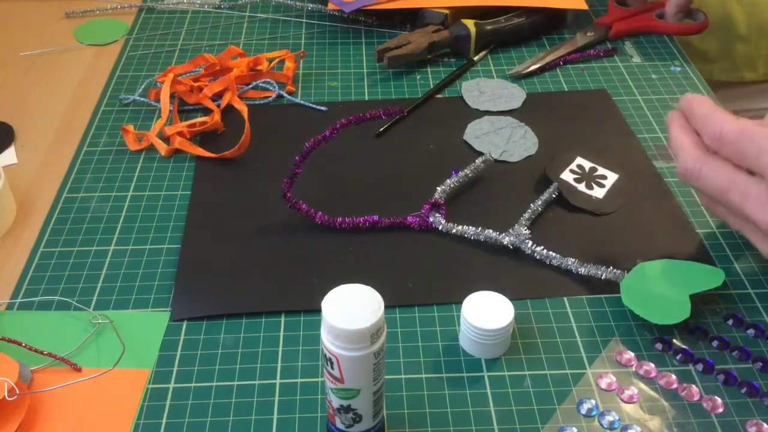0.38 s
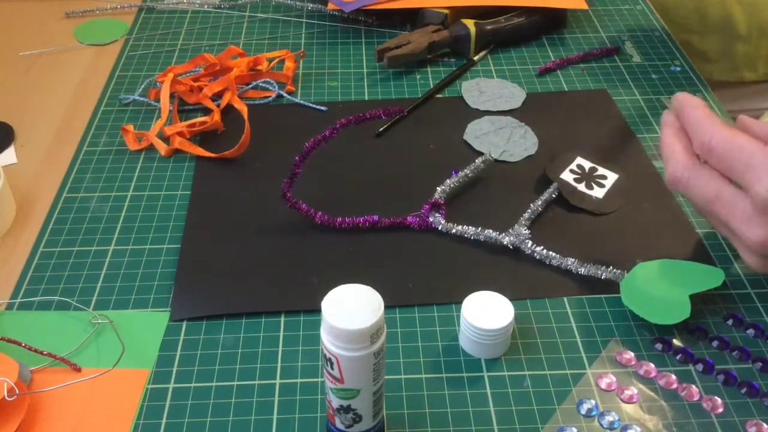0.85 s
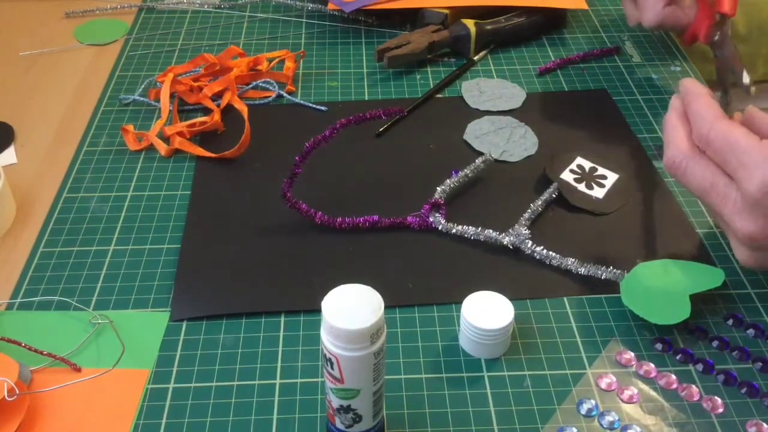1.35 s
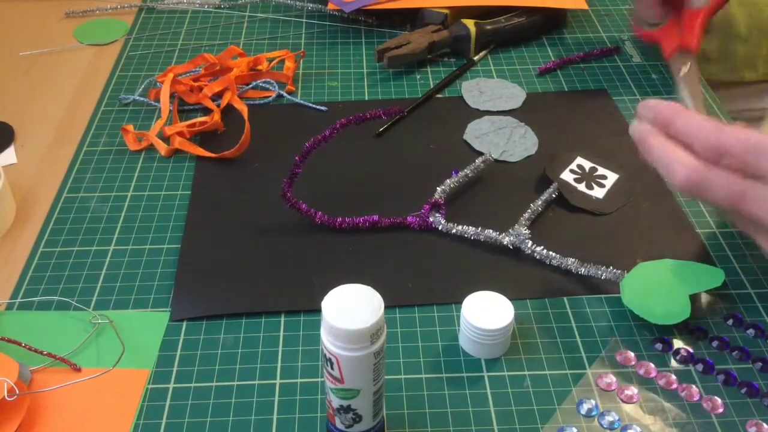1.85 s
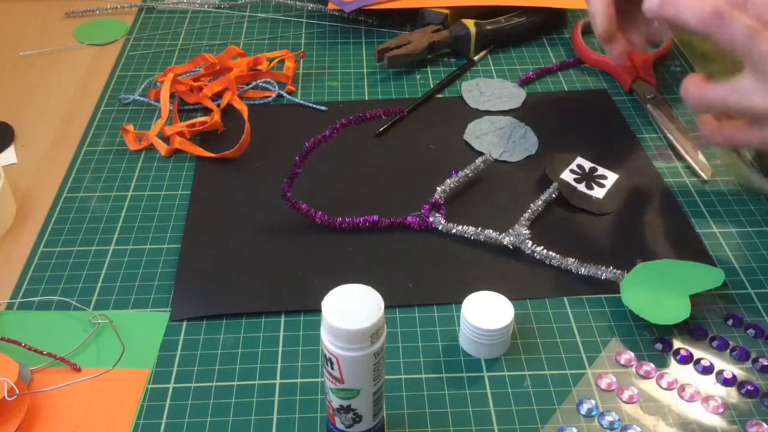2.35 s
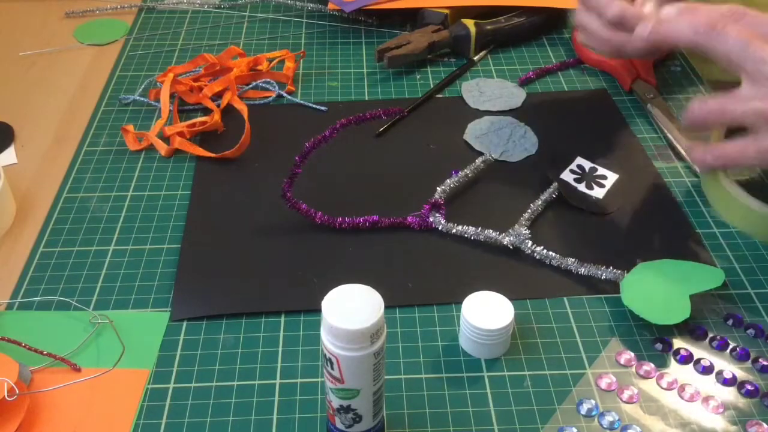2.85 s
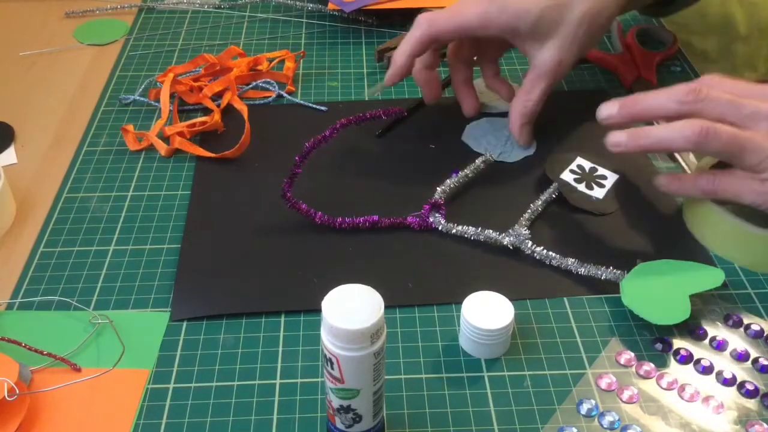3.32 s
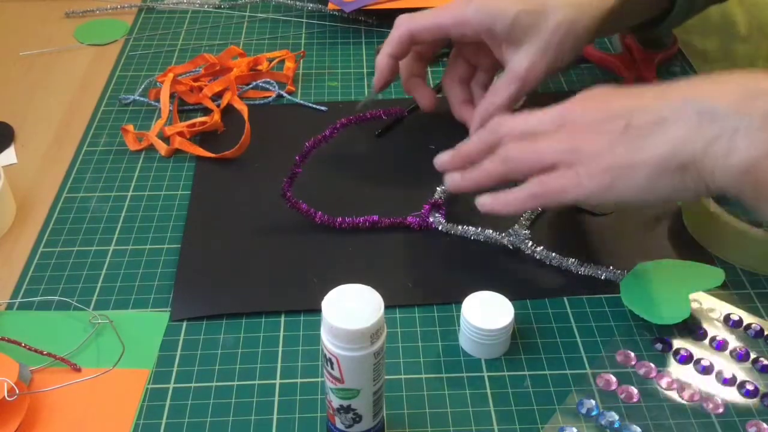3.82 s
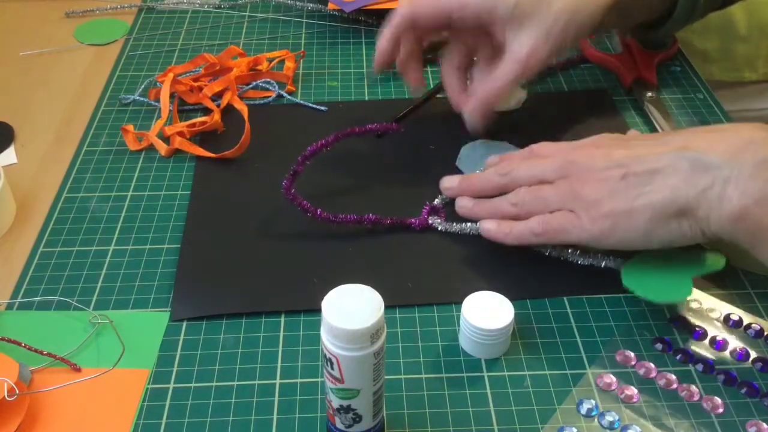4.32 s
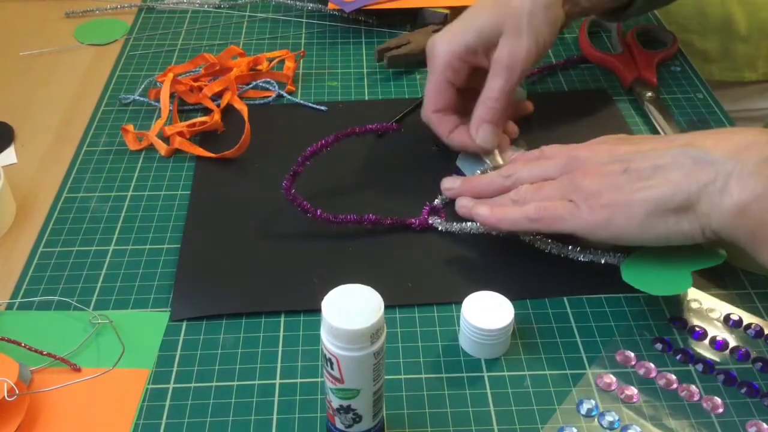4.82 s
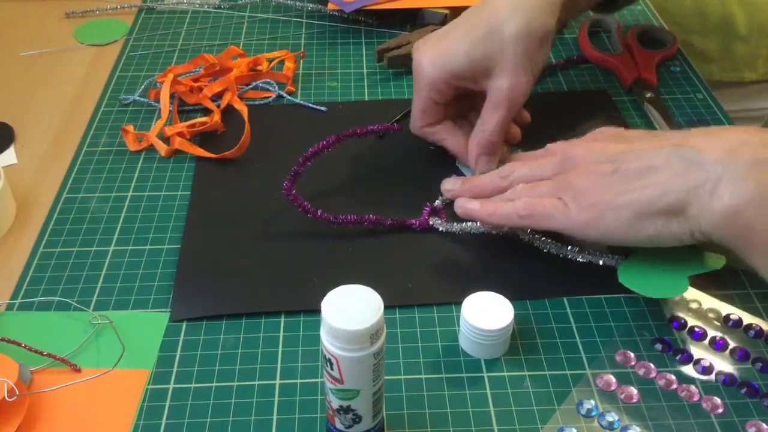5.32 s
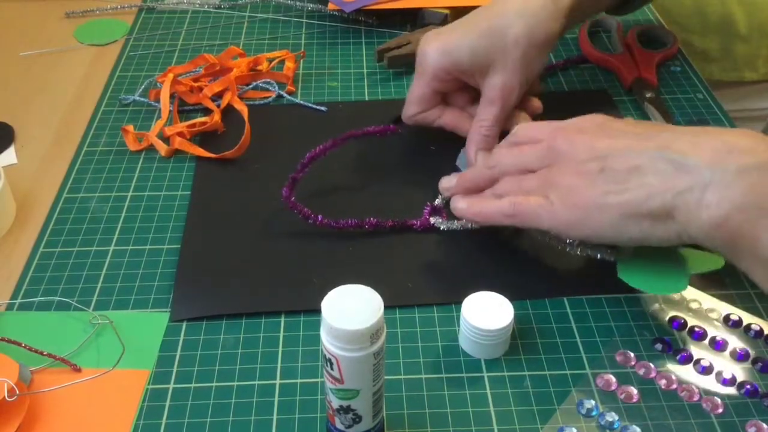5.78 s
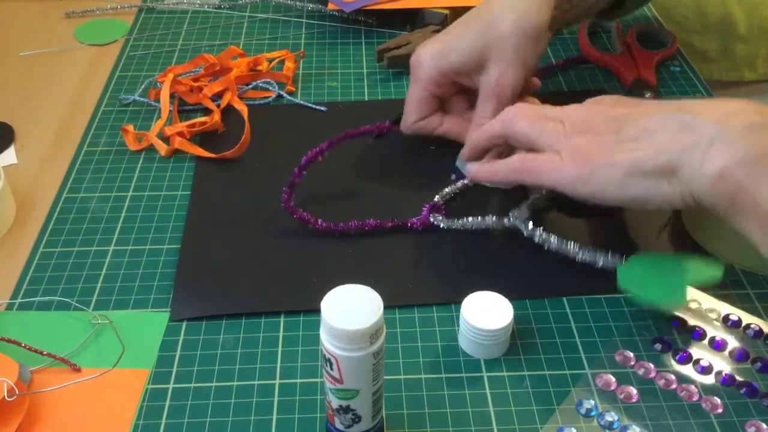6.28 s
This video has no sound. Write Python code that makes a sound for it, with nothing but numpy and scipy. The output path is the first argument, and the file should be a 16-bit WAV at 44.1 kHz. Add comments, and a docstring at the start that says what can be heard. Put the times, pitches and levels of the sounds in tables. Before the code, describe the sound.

Close, dry sounds of hands at a craft table in a small quiet room. Sparse bright ticks of tape build into a tight cluster of snaps and a firm knock as something is put down around two seconds. More crackles and brushing follow near three, then faint finger rustle, and a last sharp pair of clicks past five seconds with soft table bumps.

```python
"""Tape, scissors and card snap in short bright clicks over a craft table in a small quiet room:
noise bursts ring a body, a crack and a tick, and echo from nearby surfaces, strongest after 6.7 ms.
Fingers rustle over card and tinsel: clumped random slips, shaped by strokes and slides.
Things knock on the table top, ringing its damped modes; rumble and room air are filtered noise."""
import sys
import numpy as np
from scipy import signal
from scipy.fft import rfft, irfft, next_fast_len
from scipy.io import wavfile
from scipy.ndimage import uniform_filter1d

SR = 44100
rng = np.random.default_rng(int(sys.argv[2]) if len(sys.argv) > 2 else 0)


def materialize(psi):
    """Save the field psi as 16-bit PCM at rate SR to the path in sys.argv[1].

    A 1-D psi becomes a single channel; in a 2-D psi each row is a channel.
    """
    bounded = np.clip(np.atleast_2d(psi).T, -1, 1)
    quanta = np.round(bounded * 32767).astype(np.int16)
    wavfile.write(sys.argv[1], SR, quanta)


def undo_db(level):
    """Turn decibels back into plain size, where 20 dB means ten times bigger."""
    steps = np.asarray(level, float) / 20
    return 10 ** steps


N = 282681


def rms_one(x):
    """Scale to rms 1."""
    return x / np.sqrt(np.mean(x ** 2) + 1e-20)


def in_time(rows):
    """Interpolate each column of a time table at every sample."""
    s, *columns = np.transpose(rows)
    return [np.interp(np.arange(N) / SR, s, column) for column in columns]


def band(x, low_hz, high_hz):
    """Second-order Butterworth band-pass."""
    sos = signal.butter(2, [low_hz, min(high_hz, 0.45 * SR)], "band", fs=SR, output="sos")
    return signal.sosfilt(sos, x)


def colour(x, points):
    """Shape by a spectrum, straight dB lines on log frequency; rms 1."""
    hz, level_db = np.transpose(points)
    size = next_fast_len(N)
    log_hz = np.log(np.arange(1, size // 2 + 2) * SR / size)
    gain_db = np.interp(log_hz, np.log(hz), level_db, left=-60, right=-60)
    return rms_one(irfft(rfft(x, size) * undo_db(gain_db), size)[:N])


def drift(rate_hz):
    """Slow random wander of rms 1: noise through two equal one-pole low-passes."""
    step = 40  # samples per slow value
    r = np.exp(-2 * np.pi * rate_hz * step / SR)
    noise = rng.standard_normal(N // step + 2002)
    slow = signal.lfilter([1], [1, -2 * r, r * r], noise)[2000:]  # settled part
    return np.interp(np.arange(N) / step, np.arange(len(slow)), rms_one(slow))


def grains(per_s, spread_db):
    """Random tiny slips of uneven size."""
    sizes = undo_db(spread_db * np.minimum(rng.exponential(1, N), 4)) * rng.standard_normal(N)
    return sizes * (rng.random(N) < per_s / SR)


def dying(s, level_db, t60_s):
    """Envelope that jumps up at each moment and dies away exponentially."""
    kicks = np.full(N, 1e-18)
    np.add.at(kicks, np.round(s * SR).astype(int), undo_db(level_db))
    return signal.lfilter([1], [1, -undo_db(-60 / (t60_s * SR))], kicks)


# room air spectrum: (frequency [Hz], relative density [dB per Hz])
AIR_SPECTRUM = [(180, -23), (300, -17), (502, -5.5), (885, -8), (1080, -2.5), (1560, -11), (2880, -18.5),
                (6620, -20.5), (7690, -22.5), (9550, -13), (10700, -17.5), (12500, -20), (16000, -51.5)]
AIR_RMS_DB = -79.5


def room_air():
    """Steady noise with the spectrum of the room air."""
    return undo_db(AIR_RMS_DB) * colour(rng.standard_normal(N), AIR_SPECTRUM)


# arms and table shifting: (time [s], below 90 Hz [dB], 90-220 Hz [dB], 220-450 Hz [dB])
RUMBLE_LEVELS = [(0.0, -72, -63, -69.5), (0.39, -83, -67, -68.5), (0.73, -67.5, -62.5, -75.5),
                 (1.11, -74, -62, -75.5), (1.62, -71.5, -72, -79.5), (1.82, -84, -64, -80),
                 (1.96, -60, -64.5, -71), (2.16, -77.5, -74, -78), (2.86, -76.5, -68, -71),
                 (3.78, -80.5, -74, -82.5), (4.36, -77, -73.5, -78.5), (4.86, -83.5, -67, -79),
                 (5.05, -79.5, -64.5, -75.5), (5.25, -74, -63, -73), (5.39, -73, -78, -65),
                 (5.55, -66.5, -67, -75), (6.02, -76.5, -72, -77), (6.41, -75.5, -70.5, -73.5)]
# soft thuds of an arm or wrist on the table: (centre [s], level [dB], width [s])
ARM_THUDS = [(.075, -61, 0.017), (.55, -53.5, 0.045), (.953, -68, 0.07), (1.3, -77, 0.047),
             (1.859, -59, 0.029), (3.21, -66.5, .05), (4.729, -70, 0.065), (5.35, -64, 0.03),
             (5.618, -50, .045), (2.06, -63, 0.035), (2.93, -63, 0.043)]
# shaking after a knock, one entry per rumble band: (level against the knock [dB])
SHAKE_LEVELS_DB = [-20.5, -22.5, -8.5]
SHAKE_T60_S, SHAKE_SWELL_S = 0.1, 0.008


def rumble():
    """Lumpy low noise carried through the table; thuds stir the lowest band, knocks stir all three."""
    out, t = np.zeros(N), np.arange(N) / SR
    knock_s, knock_db, *_ = np.transpose(TABLE_STRIKES)
    thuds = sum(undo_db(level_db) * np.exp(-((t - centre) / width) ** 2)
                for centre, level_db, width in ARM_THUDS)
    bands_hz = [(42, 79.7), (95, 192.4), (215, 349)]
    rows = zip(in_time(RUMBLE_LEVELS), SHAKE_LEVELS_DB, [thuds, 0, 0], bands_hz)
    for level_db, shake_db, extra, (low_hz, high_hz) in rows:
        noise = band(rng.standard_normal(N), low_hz, high_hz)
        noise = band(noise, 0.86 * low_hz, 1.25 * high_hz)
        shake = dying(knock_s + SHAKE_SWELL_S / 2, knock_db + shake_db, SHAKE_T60_S)
        shake = uniform_filter1d(shake, round(SHAKE_SWELL_S * SR))
        out += rms_one(noise) * (undo_db(level_db) + extra + shake) * undo_db(1.5 * drift(21))
    return out


# blows that ring the table top: knocks, plus rows with the spot at 1304 Hz that ring along with a snap at the
# same moment: (time [s], strength [dB], hardness [0-1], modes favoured by the spot [Hz])
TABLE_STRIKES = [(0.072, -73, 1, 250), (.240, -53, 0.45, 630), (0.336, -54.5, 0, 294),
                 (0.366, -57.5, 0.1, 357), (0.409, -55, .1, 177), (0.433, -45.5, 0.83, 630),
                 (1.4396, -67.5, 1, 1304), (1.501, -62.5, 1, 1304), (1.820, -38, 0.71, 255),
                 (1.832, -37, 0.5, 111), (1.853, -45.5, 0, 180), (2.019, -46, 0.66, 270),
                 (2.024, -34.5, 0.82, 377), (2.04, -40.5, 0.7, 109), (2.32, -71, 1, 1304),
                 (2.356, -61.5, 0, 252), (2.411, -57.5, 0.2, 260), (2.889, -46.5, 0.5, 253),
                 (2.904, -38.5, 0.34, 379), (2.914, -53.5, 0.7, 179), (3.1034, -56, 1, 1304),
                 (3.123, -64, 0.1, 340), (3.192, -45, 0.5, 222), (3.248, -63, 0.44, 245),
                 (4.721, -63, 1, 575), (5.179, -63, 0.43, 630), (5.29, -60.5, 0.65, 770),
                 (5.342, -49, 0.8, 238), (5.397, -43, 0.36, 237), (5.429, -48, 0.2, 584),
                 (5.729, -64, 0.7, 1004), (5.979, -62.5, 0.76, 243), (6.32, -66, 1, 267)]
# table top modes: (frequency [Hz], relative level [dB], t60 [s])
TABLE_MODES = [(110, -9.5, 0.22), (178.2, -7.5, 0.13), (260, -5, 0.22), (380, -5.5, 0.091),
               (630, -3.5, 0.055), (770, -3, 0.048), (1014, -3.5, .09), (1304, -1.5, 0.037),
               (1840, -3.5, 0.034), (2240, -7.5, 0.033), (2224, -8, 0.036), (2420, -19.5, 0.051)]


def knocks():
    """A blow rings each damped mode; soft blows miss the high modes, the spot struck favours some. Rows with
    the spot at 1304 Hz give the low body ringing of a snap at the same moment."""
    rows, out = np.array(TABLE_STRIKES), np.zeros(N)
    s, strength_db, hardness, spot_hz = rows.T
    at = np.round(s * SR).astype(int)
    chance_db = 2.5 * rng.standard_normal((len(rows), len(TABLE_MODES)))
    for k, (hz, level_db, t60_s) in enumerate(TABLE_MODES):
        clicks = np.full(N, 1e-18)
        dulling_db = -8.0 * (1 - np.clip(hardness, 0, 1)) * np.log2(hz / 250)
        spot_db = 8.06 * np.exp(-(np.log2(hz / spot_hz) / 0.1) ** 2)
        blow_db = strength_db + level_db + dulling_db + spot_db + chance_db[:, k]
        clicks[at] = undo_db(blow_db) * (-1) ** k
        r, w = undo_db(-60 / (t60_s * SR)), 2 * np.pi * hz / SR
        out += signal.lfilter([0, np.sin(w)], [1, -2 * r * np.cos(w), r * r], clicks)
    return out


# quick finger strokes over tinsel, card and mat:
# (start [s], hold [s], fine rustle [dB], papery rustle [dB], coarse rub [dB])
FINGER_STROKES = [(0.0, 0.023, -72, -75.5, -73.5), (0.355, .07, -72.5, -88, -77),
                  (0.428, 0.035, -68, -75, -60), (0.464, 0.045, -71, -83, -87),
                  (0.577, 0.091, -81, -99, -89), (0.683, 0.027, -69, -90, -98),
                  (0.751, 0.029, -65, -67.5, -75), (0.807, .09, -72.5, -87, -77),
                  (1.116, .04, -66.5, -99.5, -88), (1.145, 0.04, -64, -72, -92),
                  (1.26, 0.0413, -65, -79, -79), (1.434, 0.023, -79.5, -103, -79),
                  (1.504, 0.023, -53, -68.5, -62.5), (1.561, .06, -64, -80, -78),
                  (1.745, .05, -65.5, -62, -88), (1.831, 0.02, -57.5, -62, -49),
                  (1.854, .035, -55, -62, -54), (1.933, .09, -64.5, -78, -79),
                  (1.99, 0.084, -70.5, -74, -65.5), (2.03, 0.028, -57, -55, -46),
                  (2.08, .09, -63.5, -67.5, -69), (2.188, 0.088, -78, -80.5, -79.5),
                  (2.776, 0.044, -64.5, -76, -69.5), (2.833, .04, -48.5, -52, -57.5),
                  (2.875, 0.016, -62, -83.5, -70), (2.908, .05, -89, -78.5, -64.5),
                  (3.009, .07, -71, -77.5, -82), (3.11, 0.018, -61, -56, -53.5),
                  (3.182, .025, -61, -65.5, -67), (3.187, 0.12, -57, -72, -63.5),
                  (3.465, 0.074, -50.5, -64, -70), (3.57, 0.048, -75, -84, -91),
                  (5.032, 0.03, -68, -63, -73.5), (5.084, 0.069, -61, -66, -77.5),
                  (5.343, .04, -53.5, -60.5, -62), (5.406, 0.078, -53.5, -64.5, -62),
                  (5.545, 0.0563, -56.5, -75, -77), (5.67, .07, -64, -79.5, -73),
                  (5.746, 0.075, -72.5, -91.5, -93), (5.858, 0.069, -63.5, -73, -71.5),
                  (5.969, .1, -61.5, -81.5, -78.5), (6.171, 0.094, -67.5, -85.5, -80),
                  (6.339, .1, -62.5, -75.5, -77)]
# slow hand slides: (centre [s], half width [s], fine rustle [dB], papery rustle [dB], coarse rub [dB])
HAND_SLIDES = [(.2, 0.092, -81.5, -93, -76.5), (1.476, 0.013, -70, -78.5, -69.5),
               (2.408, 0.057, -78, -77, -69.5), (2.632, 0.22, -74.5, -82, -76.5),
               (3.678, .04, -61.5, -71.5, -76.5), (3.789, .04, -65.5, -77, -94),
               (3.891, 0.056, -63.5, -81.5, -88), (4.07, 0.096, -63.5, -80.5, -95),
               (4.219, .055, -60, -73, -76), (4.35, .06, -78, -91.5, -92.5), (4.708, .05, -64, -74.5, -75),
               (4.87, 0.083, -82.5, -89.5, -86), (5.24, .07, -63.5, -79, -77.5)]
STROKE_RISE_DB_PER_S, STROKE_SAG_DB, STROKE_FALL_DB_PER_S = 896.5, 10, 700.5  # sag is over the hold
SLIDE_EDGE_DB = -8  # at the half width
# rustle left by a snap: fine against its tick, papery against its crack
AFTER_FINE_DB, AFTER_PAPERY_DB, AFTER_T60_S, AFTER_DELAY_S = -24, -34.5, 0.047, 0.006


def rustle_levels():
    """Fine, papery, coarse: strokes rise, sag and fall, slides swell and fade, snaps leave a rustle."""
    t, levels = np.arange(0, N, 32) / SR, 0
    for start, hold, *level_db in FINGER_STROKES:
        rise_db = STROKE_RISE_DB_PER_S * (t - start)
        sag_db = STROKE_SAG_DB * (start - t) / hold
        fall_db = STROKE_FALL_DB_PER_S * (start + hold - t) - STROKE_SAG_DB
        shape_db = np.minimum(sag_db, np.minimum(rise_db, fall_db))
        levels = levels + undo_db(shape_db + np.c_[level_db])
    for centre, half, *level_db in HAND_SLIDES:
        levels = levels + undo_db(SLIDE_EDGE_DB * ((t - centre) / half) ** 2 + np.c_[level_db])
    fine, papery, coarse = [np.interp(np.arange(N) / SR, t, level) for level in levels]
    s, _, _, crack_db, tick_db = np.transpose(SNAP_PEAKS)
    s = s + AFTER_DELAY_S
    fine = fine + dying(s, tick_db + AFTER_FINE_DB, AFTER_T60_S)
    papery = papery + dying(s, crack_db + AFTER_PAPERY_DB, AFTER_T60_S)
    return fine, papery, coarse


def patchy(x, patch_db):
    """Narrow bands brighten and fade on their own as the contact shifts; rms 1."""
    edges_hz = 400 * 2 ** np.arange(0, 5.6, 0.4)
    out = np.zeros(N)
    for k, (low_hz, high_hz) in enumerate(zip(edges_hz[:-1], edges_hz[1:])):
        # alternate signs: neighbours add up where they meet
        out += (-1) ** k * band(x, low_hz, high_hz) * undo_db(patch_db * drift(27.0))
    return rms_one(out)


# slip spectra: (frequency [Hz], relative density [dB per Hz])
FINE_SPECTRUM = [(2940, -45), (5000, -16), (5500, -11), (6390, -10.5), (7490, -14), (8710, 3), (10400, -2),
                 (13400, -10), (15800, -5.5), (16300, -16), (16500, -66)]
PAPERY_SPECTRUM = [(1800, -40), (2800, -5.5), (4200, -0.5), (6000, -4), (8000, -7)]
COARSE_SPECTRUM = [(350, -0.5), (600, 2), (1200, -0.5), (2300, -2), (3500, -8.5)]
CRACKLES_PER_S, CRACKLE_DB = 250, -10  # lone crackles, level against the fine rustle


def rustle():
    """Dense slips, clumped in time: fine and bright on tinsel, coarser on card and mat."""
    fine_level, papery_level, coarse_level = rustle_levels()
    pressure = undo_db(1.5 * drift(12) + 1.2 * drift(60))
    crackles = undo_db(CRACKLE_DB) * colour(grains(CRACKLES_PER_S, spread_db=2.5), FINE_SPECTRUM)
    fine = colour(grains(9600, spread_db=1.5), FINE_SPECTRUM) + crackles
    papery = colour(grains(3700, spread_db=-2.0), PAPERY_SPECTRUM)
    coarse = colour(grains(3000, spread_db=2.5), COARSE_SPECTRUM)
    slips = pressure * (fine * fine_level + papery * papery_level + coarse * coarse_level)
    return patchy(slips, patch_db=2.3) * np.sqrt(np.mean(slips ** 2))  # rms of slips kept


# early echoes: (time after the direct sound [s], level [dB])
EARLY_ECHOES = [(.0060, -17), (.0067, -12), (.0093, -15), (.0105, -14), (.0124, -18), (.0155, -21)]
# diffuse tails, near clutter and walls: (level [dB], t60 [s])
DIFFUSE_TAILS = [(-46, 0.01), (-48.5, 0.23)]
TAIL_START_S = 0.006


def room(x):
    """Direct sound, a cluster of near echoes and dying diffuse noise tails, by convolution."""
    t = np.arange(SR // 2) / SR - TAIL_START_S
    tails = sum(undo_db(level_db - 60 * t / t60_s) for level_db, t60_s in DIFFUSE_TAILS)
    reply = tails * (t > 0) * rng.standard_normal(len(t))
    reply[0] = 1
    for k, (s, level_db) in enumerate(EARLY_ECHOES):
        reply[round(s * SR)] += undo_db(level_db) * (-1) ** k
    return signal.fftconvolve(x, reply)[:N]


# snaps of tape, blades and card, peak of each resonance:
# (time [s], body [dB], crack frequency [Hz], crack [dB], tick [dB])
SNAP_PEAKS = [(0.071, -58, 2870, -61, -71), (0.336, -64, 3920, -58, -69), (0.3457, -70, 7500, -59.5, -50.5),
              (0.381, -59, 7220, -81, -55.5), (0.4274, -50, 4100, -53.5, -59),
              (0.4629, -67, 7400, -77, -32.5), (0.603, -84, 7300, -75, -53),
              (0.7438, -52, 4080, -43.5, -46), (1.141, -55.5, 6400, -28, -25.5),
              (1.2549, -42, 8160, -33, -24.5), (1.4417, -68, 5500, -63.5, -68.5),
              (1.4772, -50.5, 3370, -73.5, -45), (1.493, -48, 5860, -36.5, -41),
              (1.5017, -39, 3680, -39, -37), (1.5616, -52, 6100, -41, -32), (1.7038, -64, 6200, -72, -29),
              (1.7359, -42.5, 7200, -25.5, -21.5), (1.802, -59, 6560, -37.5, -40.5),
              (1.8208, -33, 3640, -28.5, -26), (1.831, -40.5, 3160, -55, -42),
              (1.8533, -34.5, 7900, -23.5, -15.5), (1.9105, -59.5, 6140, -39, -39),
              (1.917, -49.5, 6530, -45, -32), (1.987, -50, 3070, -54.5, -47),
              (2.0246, -19.5, 3900, -25, -22.5), (2.038, -32, 4540, -57.5, -44.5),
              (2.0917, -59, 5860, -56, -45), (2.1063, -58, 5480, -42.5, -37),
              (2.131, -61, 6050, -50, -46.5), (2.32, -58, 4480, -55.5, -52.5),
              (2.3946, -61, 6660, -50.5, -46), (2.4738, -74, 7460, -76, -48), (2.534, -86, 7400, -94, -46),
              (2.588, -67, 6400, -46.5, -41.5), (2.7806, -62, 4700, -48, -39.5),
              (2.7842, -65, 4500, -57.5, -40.5), (2.833, -47, 7100, -28.5, -25.5),
              (2.846, -50, 8500, -30.5, -25.5), (2.9022, -54, 3260, -48, -55),
              (2.9053, -33, 3740, -40, -53.5), (3.0093, -66.5, 7600, -54.5, -49),
              (3.1032, -41.5, 4800, -23, -20.5), (3.1184, -64.5, 4500, -56.5, -44.5),
              (3.1793, -51.5, 5520, -54.5, -46.5), (3.1943, -45.5, 5150, -27.5, -18),
              (3.46, -56.5, 5420, -39, -32), (3.8795, -73.5, 5950, -52, -43.5),
              (4.01, -76.5, 5100, -54.5, -46), (4.1023, -74, 5500, -70, -46), (4.192, -74, 5700, -67, -57),
              (4.227, -64.5, 4980, -59, -46.5), (4.363, -76, 7240, -67.5, -51.5),
              (4.594, -81, 7300, -70, -54), (4.6434, -84, 5680, -69.5, -50.5),
              (5.038, -58.5, 3940, -45, -45.5), (5.092, -73, 3800, -60, -43.5),
              (5.116, -69, 3900, -50.5, -46.5), (5.1356, -63, 4900, -38.5, -32),
              (5.3392, -50.5, 4250, -31.5, -29.5), (5.347, -57.5, 4240, -37.5, -38.5),
              (5.387, -77.5, 7150, -43.5, -30), (5.397, -52, 4230, -21.5, -15.5),
              (5.449, -70, 3630, -46.5, -33.5), (5.457, -55, 5800, -52.5, -39),
              (5.5455, -72, 6130, -49, -40), (5.6728, -57.5, 4880, -48.5, -45.5),
              (5.6991, -77, 6060, -47, -29.5), (5.866, -56.5, 6240, -38.5, -34),
              (5.979, -65, 3600, -52, -51.5), (6.009, -79, 6620, -51.5, -41.5),
              (6.0241, -76, 4970, -51.5, -51), (6.173, -75, 6400, -62.5, -53),
              (6.3221, -53.5, 4080, -59, -61)]
BODY_LOW_HZ, BODY_HIGH_HZ = 1750, 2580
LOW_BODY_LOW_HZ, LOW_BODY_HIGH_HZ, LOW_BODY_DB = 1175, 1456, -14.5  # level against the body


def snaps():
    """A crackle swells in under 1 ms, dies in a few, and rings two body bands, a crack and a tick."""
    rows, size = np.array(SNAP_PEAKS), 400
    t = np.arange(size) / SR - 0.0008
    swell = np.exp(-np.maximum(t / 0.0011, -t / 0.0003))
    bursts = rng.standard_normal((len(rows), size)) * swell
    bursts *= undo_db(4.0 * rng.exponential(1, bursts.shape))  # a few slips stand out
    out = np.zeros(N + size)
    for burst, (s, body_db, crack_hz, crack_db, tick_db) in zip(bursts, rows):
        at = round((s + t[0]) * SR)
        resonances = [(BODY_LOW_HZ, BODY_HIGH_HZ, body_db),
                      (LOW_BODY_LOW_HZ, LOW_BODY_HIGH_HZ, body_db + LOW_BODY_DB),
                      (0.78 * crack_hz, 1.305 * crack_hz, crack_db),
                      (8100, 11800, tick_db)]
        for low_hz, high_hz, level_db in resonances:
            rung = band(band(burst, low_hz, high_hz), 0.87 * low_hz, 1.1 * high_hz)
            out[at:at + size] += rung / np.abs(rung).max() * undo_db(level_db)
    return out[:N]


def scene():
    """Snaps echo in the room; knocks, rustle, rumble and air are added dry; one channel."""
    air = room_air()
    return (room(snaps()) + rustle() + knocks() + rumble() + air)[None]


def band_limit(x):
    """A steep low-pass at the top of the band."""
    return signal.sosfilt(signal.butter(12, 16820, fs=SR, output="sos"), x)


def record(dry):
    """The microphone drops the deepest bass; a steep low-pass cuts the top."""
    low_cut = signal.butter(4, 40, "high", fs=SR, output="sos")
    top_cut = signal.cheby2(12, 70, 17200, fs=SR, output="sos")  # 70 dB down from 17200 Hz
    mix = signal.sosfilt(top_cut, signal.sosfilt(low_cut, dry))
    return band_limit(mix)


dry = scene()
out = record(dry)
materialize(out)
```